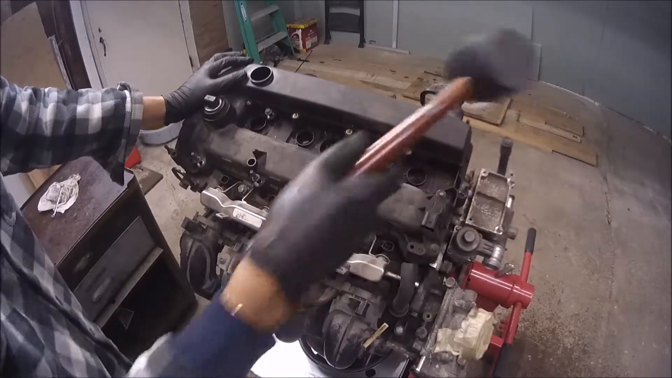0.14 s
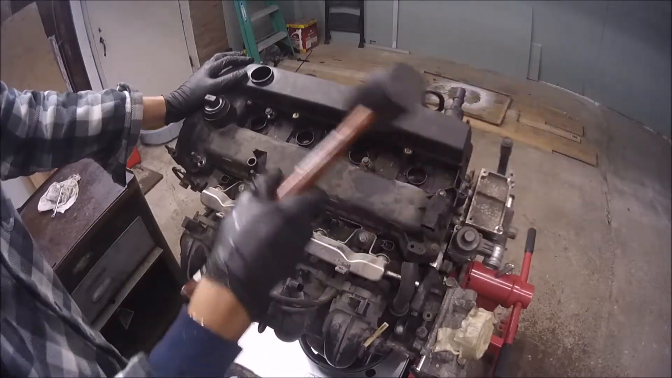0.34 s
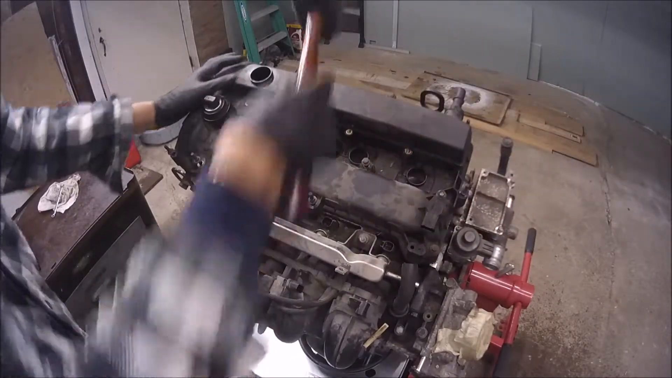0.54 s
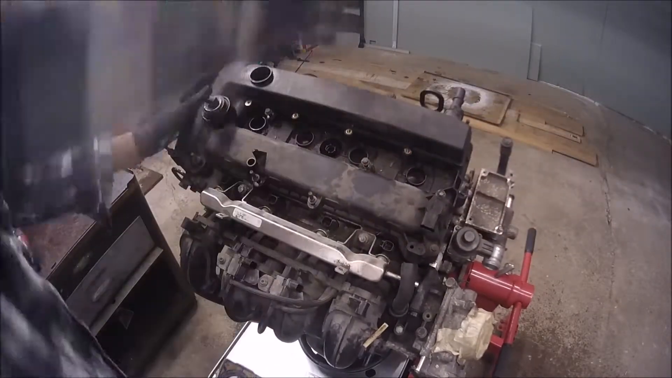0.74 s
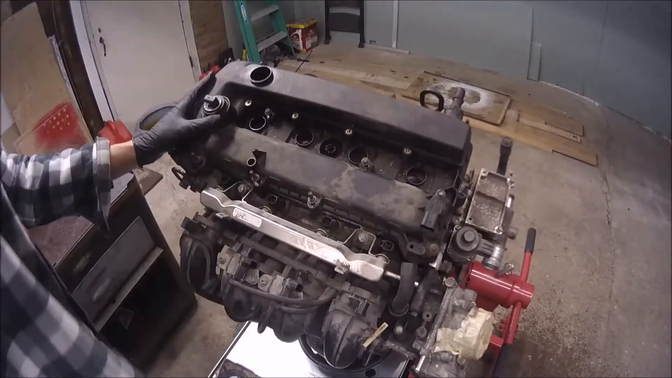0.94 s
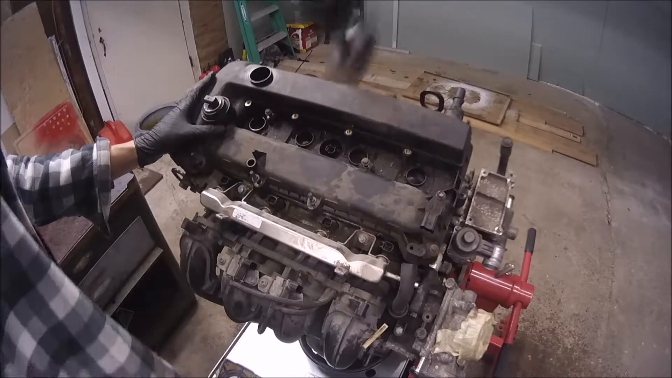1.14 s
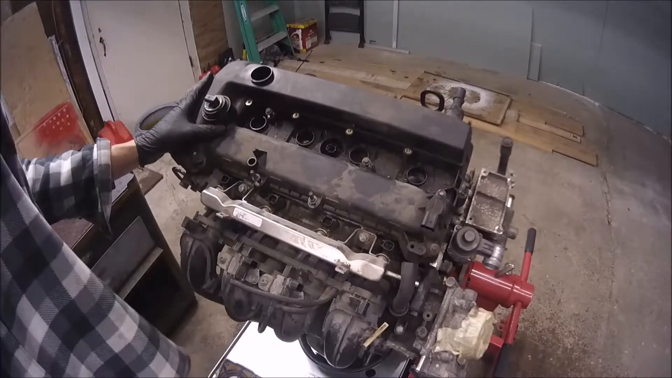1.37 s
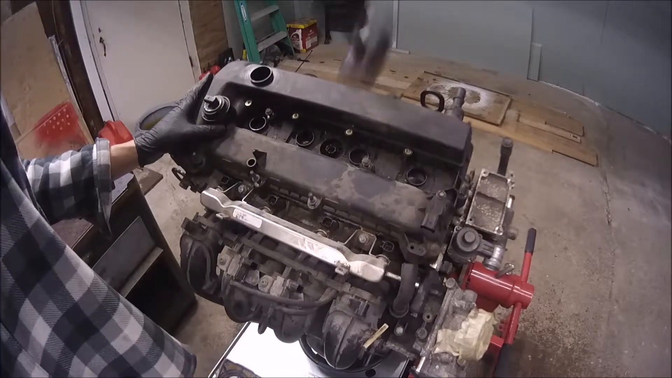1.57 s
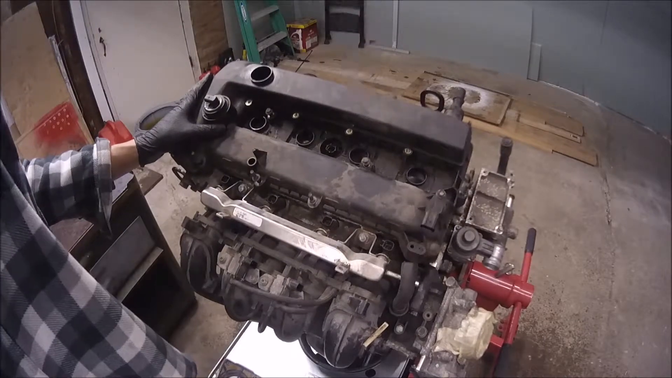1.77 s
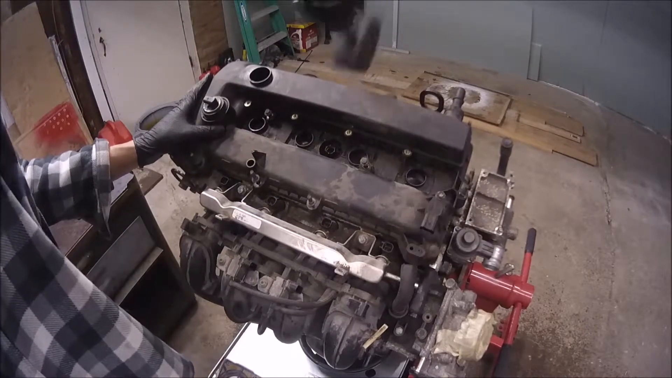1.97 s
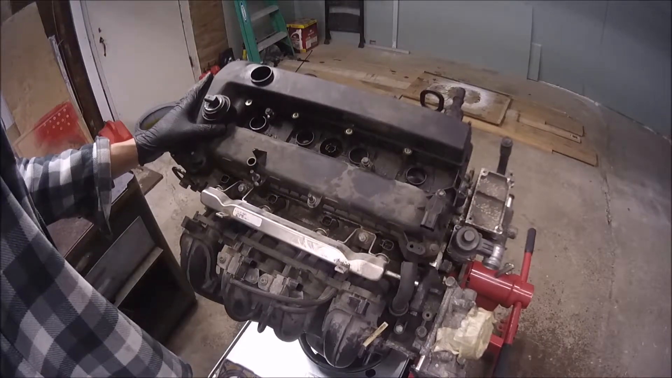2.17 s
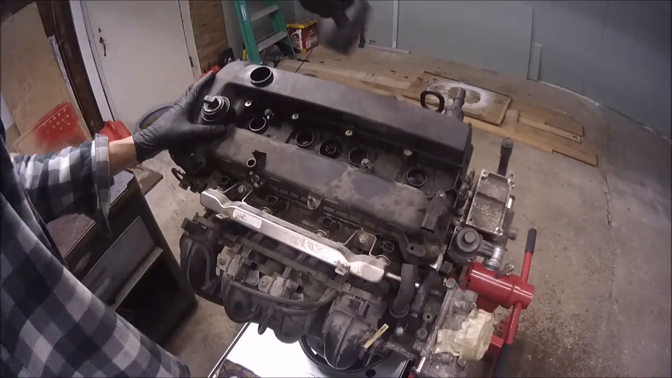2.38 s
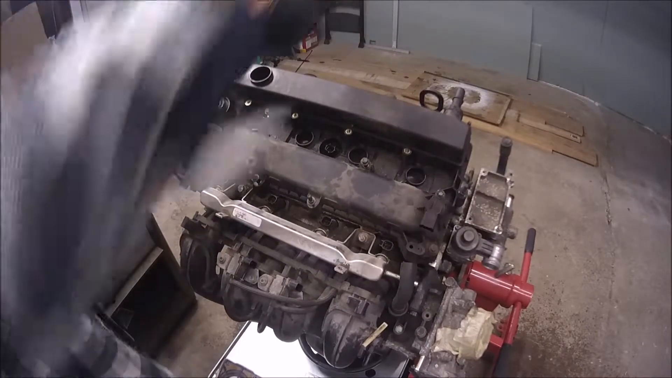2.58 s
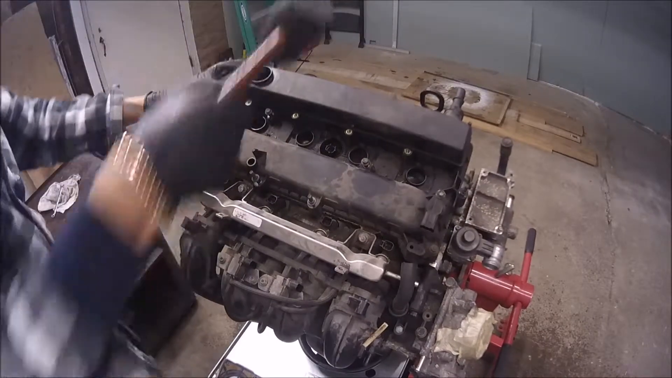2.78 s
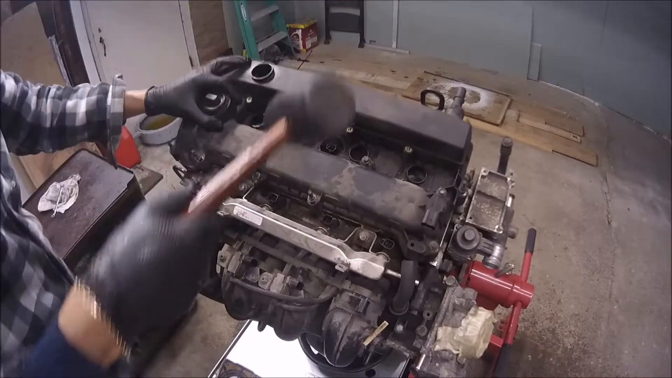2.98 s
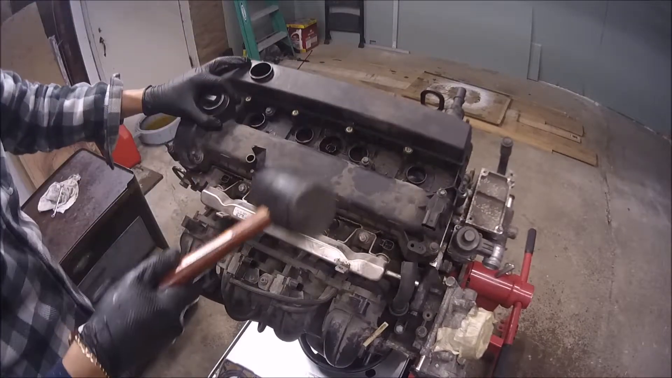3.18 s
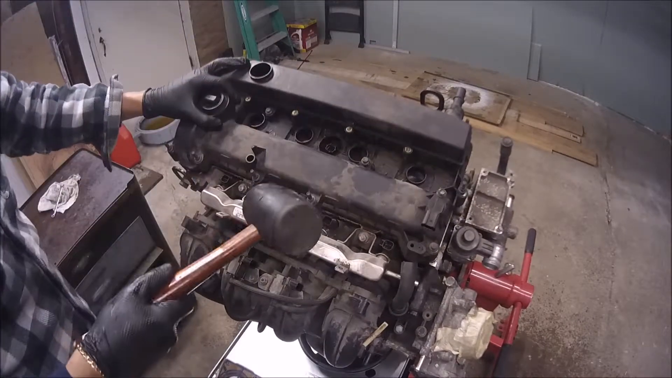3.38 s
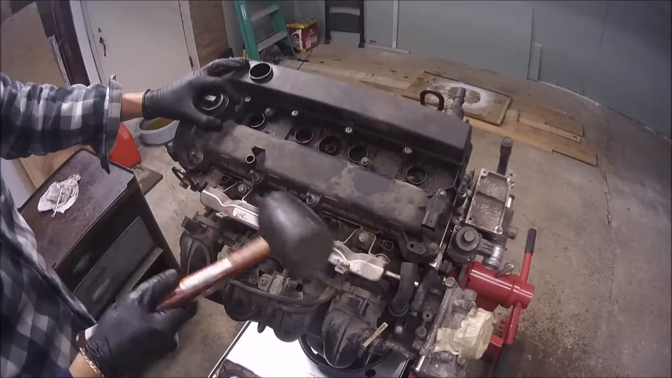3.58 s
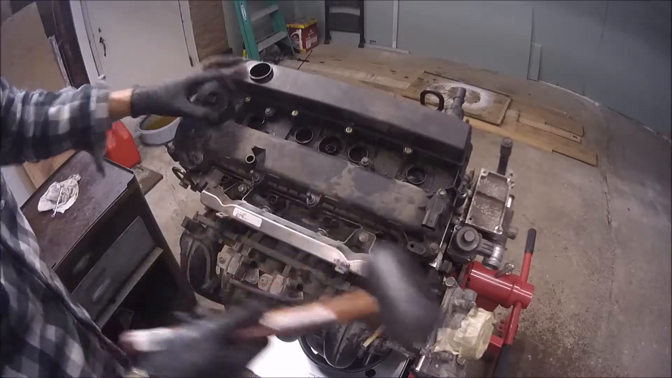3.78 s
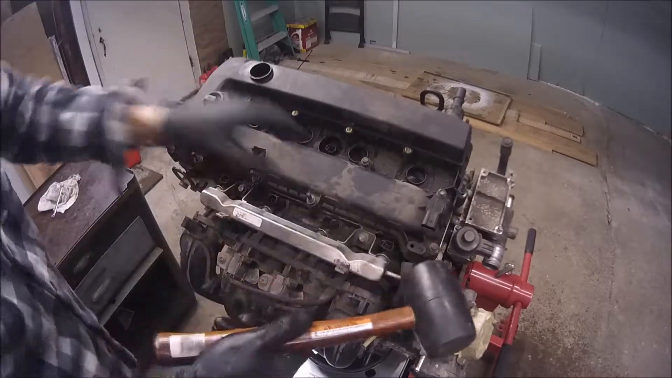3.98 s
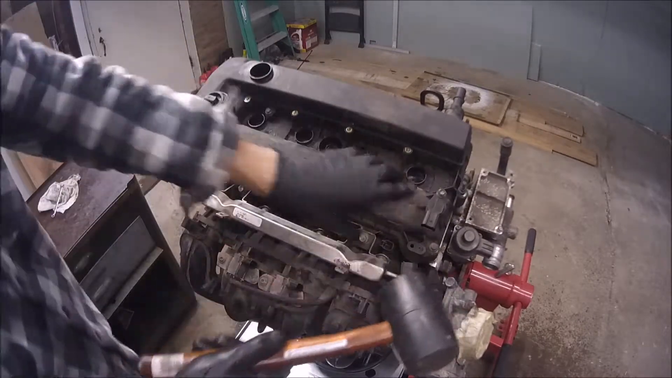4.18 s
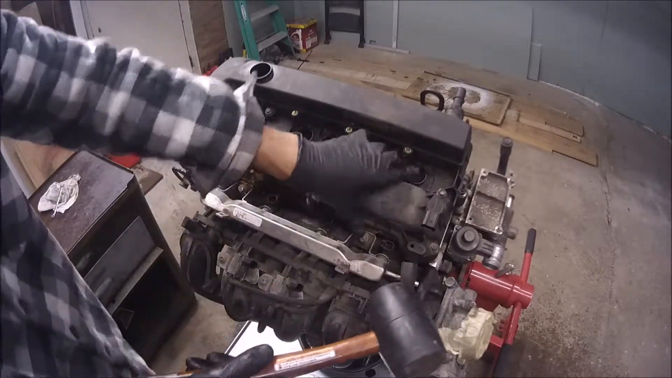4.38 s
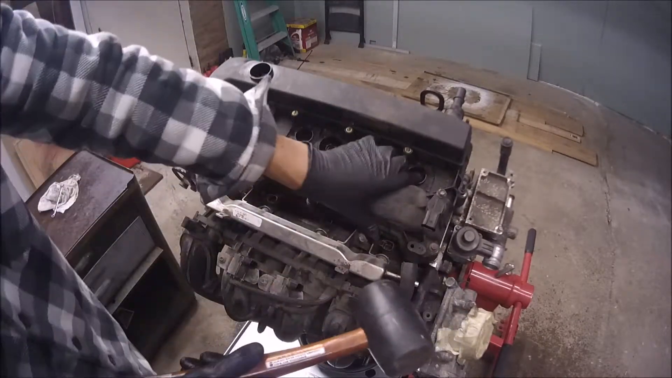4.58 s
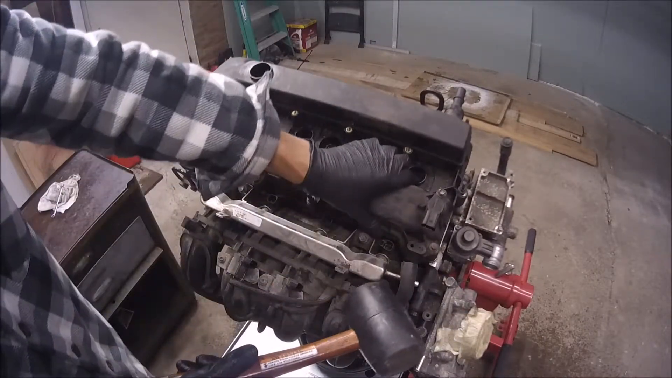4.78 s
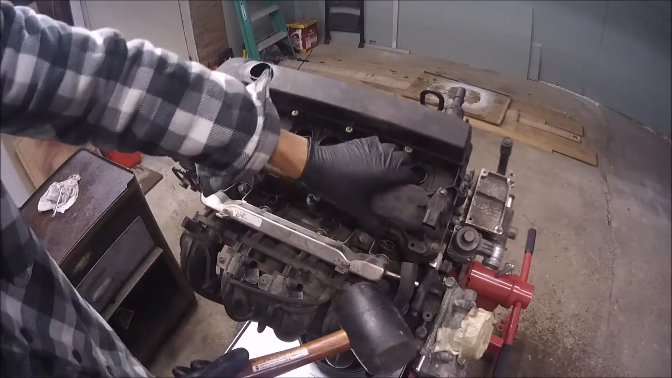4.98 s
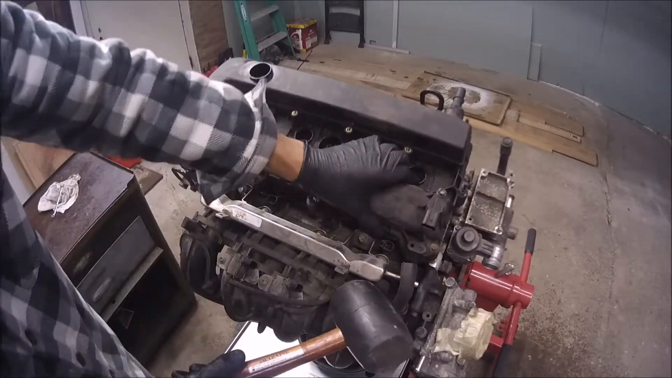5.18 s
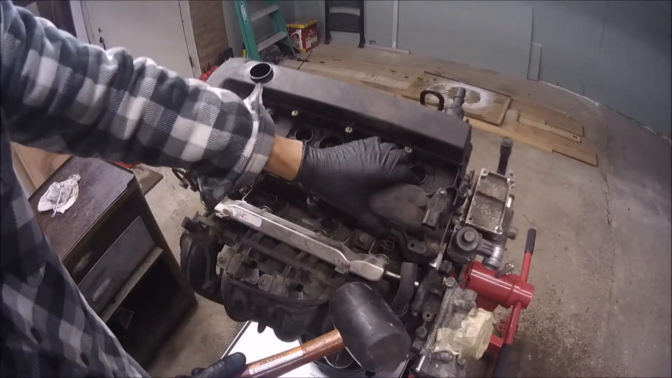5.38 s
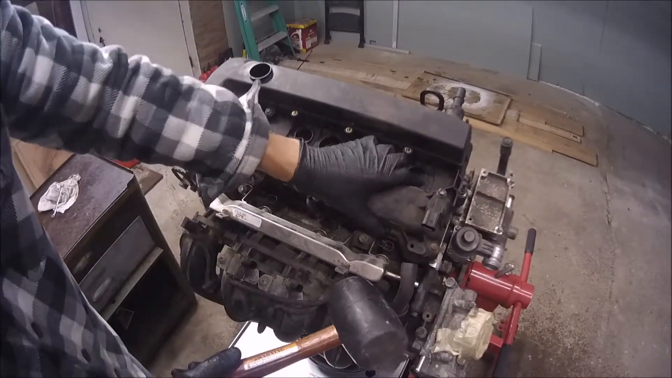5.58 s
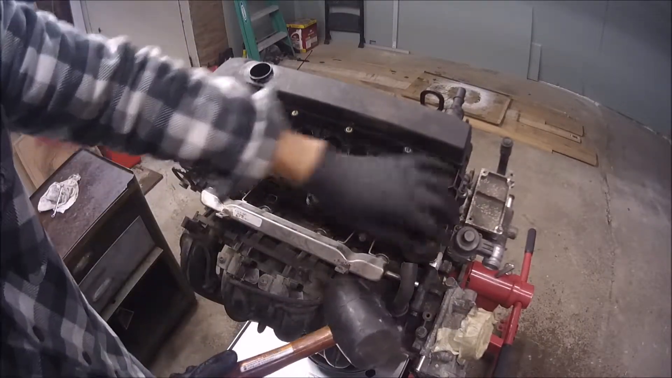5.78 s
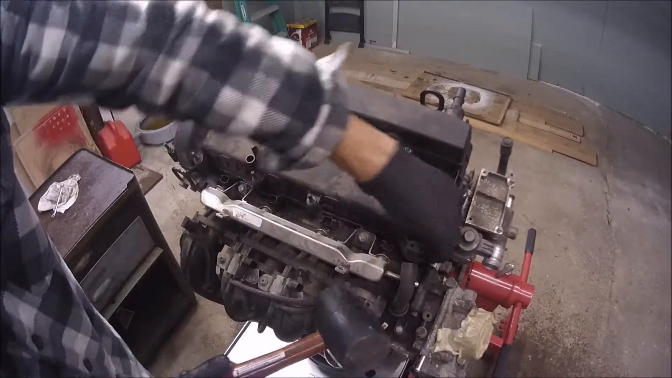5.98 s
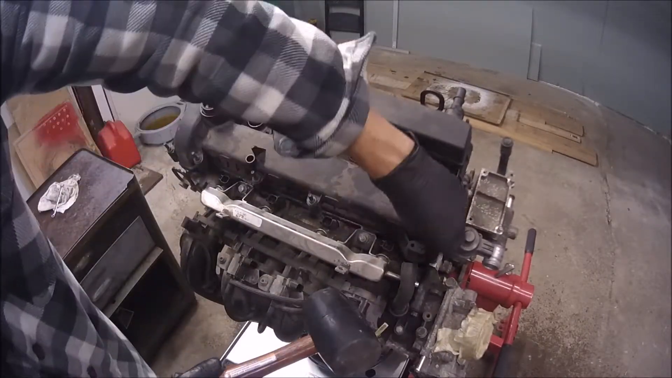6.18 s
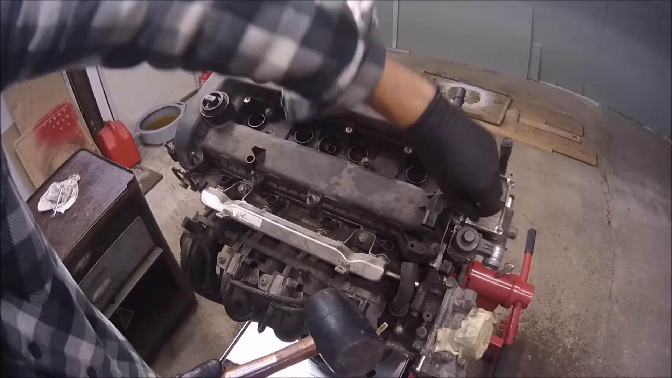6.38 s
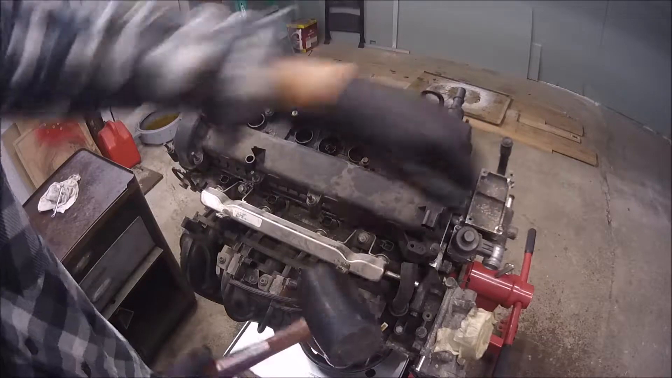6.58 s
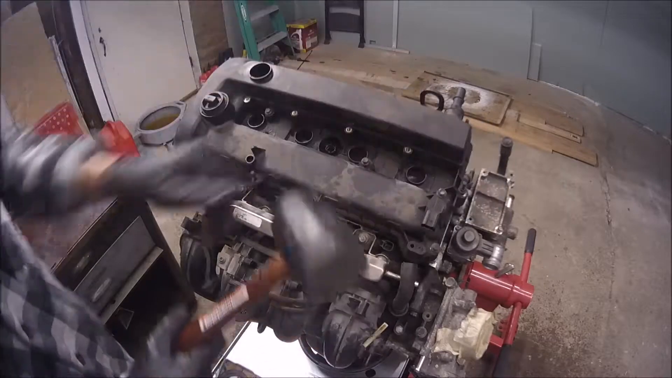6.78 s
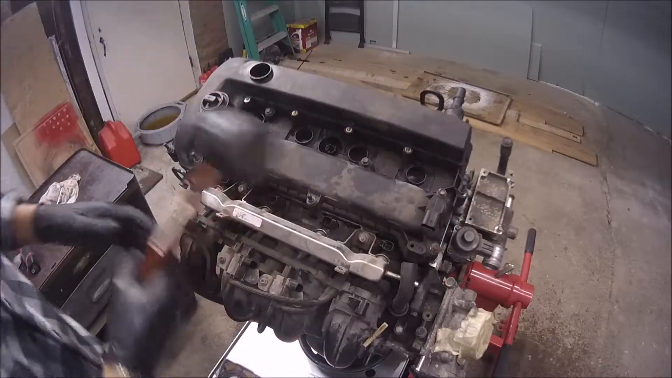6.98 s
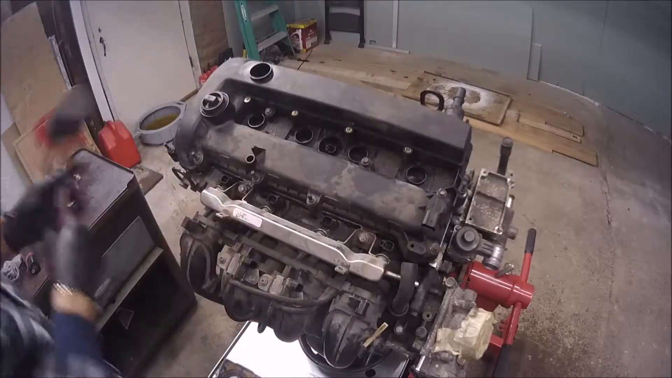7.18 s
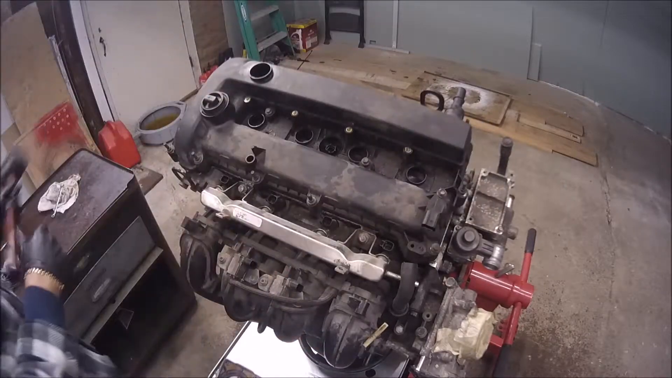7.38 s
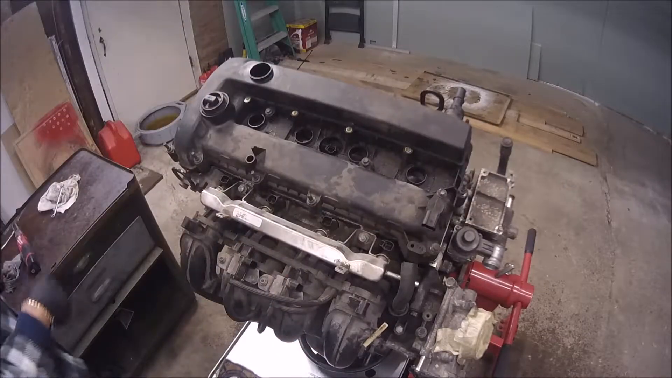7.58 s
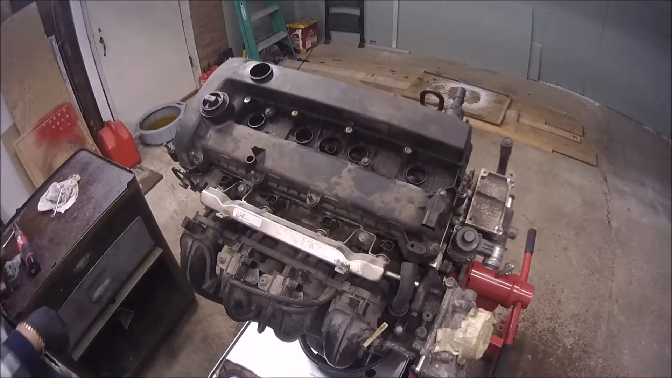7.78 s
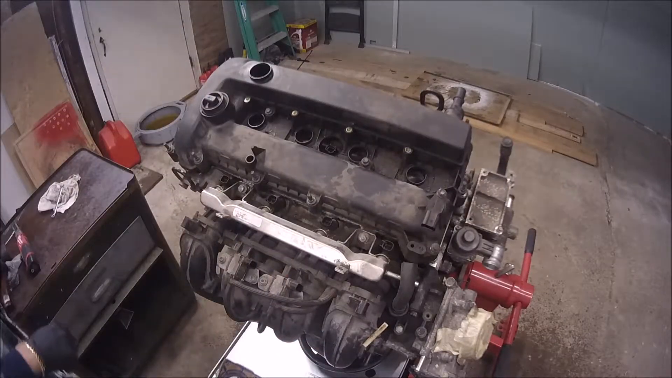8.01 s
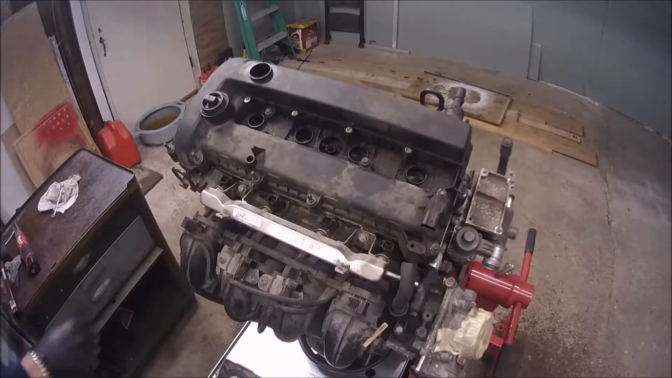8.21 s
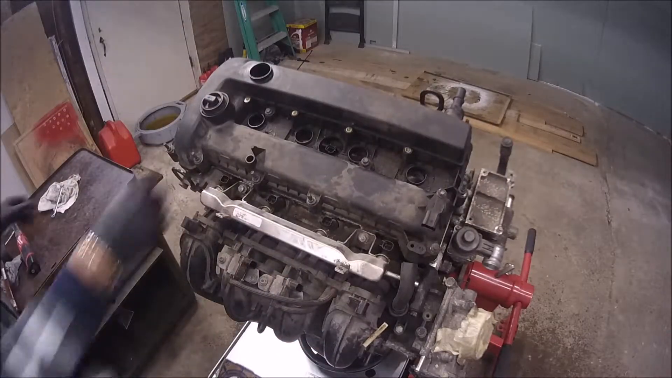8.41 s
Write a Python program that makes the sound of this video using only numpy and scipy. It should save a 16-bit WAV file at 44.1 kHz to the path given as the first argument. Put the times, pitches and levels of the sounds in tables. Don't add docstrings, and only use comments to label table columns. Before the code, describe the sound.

A rubber mallet slams a loose engine cover, overloading a small microphone; sleeves rustle and gloved fingertips tap and tug the parts afterward.

```python
import sys
import numpy as np
from scipy import signal
from scipy.fft import rfft, irfft
from scipy.io import wavfile
from scipy.ndimage import uniform_filter1d

SR = 44100
rng = np.random.default_rng(int(sys.argv[2]) if len(sys.argv) > 2 else 0)


def elevation(decibels):
    levels = np.asarray(decibels, float)
    return 10 ** (levels / 20)


def int16_out(signal):
    q = np.round(np.clip(np.atleast_2d(signal).T, -1, 1) * 32767)
    wavfile.write(sys.argv[1], SR, q.astype(np.int16))


N = 372644

# frequency in Hz, density in dB per Hz.
HISS_SPECTRUM = [(30, -24.5), (70, -20), (250, -7), (600, -2.5), (2000, -5.5), (7000, -13), (10000, -11),
                 (15400, -15.5)]
# time in seconds, gain in dB.
HISS_DUCKING = [(0, -1.5), (1.2, -2), (2.801, -4.5), (3.0, -9.5), (3.5, -10.5), (3.9, -3.5), (6.5, -3.5),
                (7.0, -4), (8.45, -3)]
# peak time in seconds, level in dB,
# brightness in dB per band, swell in seconds, fade in seconds (20 dB each).
RUSTLE_MOVES = [(0.558, -48.5, 5, .14, 0.088), (0.677, -40.5, -4.5, 0.036, 0.14),
                (0.8, -59.5, 1, 0.087, 0.15), (0.95, -58, 0.5, 0.2, 0.14), (1.05, -54.5, -6.5, .06, 0.23),
                (3.05, -55.5, -10, 0.074, 0.033), (3.828, -49, 3, .1, 0.026),
                (3.874, -63, -14.5, 0.026, 0.052), (4.25, -41, 2, 0.031, 0.11),
                (4.393, -44.5, -.4, 0.054, 0.044), (4.44, -57.5, -10, .025, 0.13),
                (4.5, -50, 2, 0.07, 0.31), (4.75, -56.5, -1.2, 0.38, .3), (4.95, -59, 5, 0.07, 0.14),
                (5.329, -55.5, -0.5, 0.055, 0.22), (5.678, -48.5, -4, .1, 0.099),
                (5.92, -50, 5, 0.036, 0.07), (6.0, -57, -1.5, 0.053, .3), (6.2, -59, -3.5, .1, .08),
                (7.175, -47.5, 5, 0.019, 0.29), (7.29, -55, -3, .08, 0.26), (7.8, -60, -6, .03, 0.16),
                (7.917, -49, -12, 0.12, 0.14), (8.17, -51, -2.8, 0.11, 0.083)]
CLOTH_BANDS_DB = [-5, 2.5, 1.1, -4]
# frequency in Hz, t60 in seconds.
GARAGE_DECAY = [(100, 0.95), (260, 0.65), (700, 0.68), (1840, 0.64), (4850, 0.68), (9000, 0.5),
                (13000, 0.15)]
# frequency in Hz, level in dB.
WALL_COLOUR = [(100, -32.5), (200, 2.5), (300, 0.5), (1000, 0), (3000, -0.5), (7000, -4), (12000, -1.5),
               (15400, -14.5)]
# start in seconds, peak in dB, frequency in Hz, t60 in seconds.
THUDS = [(0.006, -31.5, 122, 0.45), (0.008, -22.5, 205, 0.21), (0.008, -24.5, 255, 0.38),
         (0.008, -28.5, 511, 0.47), (0.658, -42, 320, 0.1), (0.665, -54, 195, 0.17),
         (1.22, -33, 156.3, 0.6), (1.657, -33, 156, 0.3), (2.022, -37, 152, 0.27), (2.331, -29, 158, 0.17),
         (3.061, -57.5, 129, 0.091), (3.195, -55, 320, 0.14), (3.805, -53, 320, .12), (3.874, -50, 302, .1),
         (4.099, -62.5, 150.3, 0.48), (4.48, -52, 330, 0.18), (4.739, -54, 332, .15),
         (7.89, -31.5, 111, 0.42), (7.894, -42, 82, 0.4), (7.937, -33.5, 138.5, 0.35),
         (7.99, -43, 103.4, 0.62), (8.059, -49.5, 251, 0.5), (8.191, -41, 123, 0.72), (8.25, -45, 96, 0.59)]
# start in seconds, peak in dB, frequency in Hz, t60 in seconds.
STEEL_PING = [
    (3.0605, -41, 13200, .18),
]
# start in seconds, then peak, body, bright and room levels in dB.
FAR_KNOCK = [
    (8.191, -5.5, -15, -18.5, 4.5),
]
# start in seconds, then peak, bright and room levels in dB.
TICKS = [(0.019, -8, 1, -11), (0.764, -44.5, 11.5, -2.5), (0.785, -43, 8, -12), (1.178, -49, 20, 0.5),
         (1.197, -48, 27, 6), (1.62, -41.5, 19, -1), (1.629, -33.5, 12.5, -4), (1.646, -37, 14, -4),
         (1.995, -42, 14.5, -12), (4.74, -52.5, 18, -9), (4.838, -39, 6, -3), (5.671, -41.5, 9.5, -13),
         (5.912, -46.5, 10, 4), (6.266, -24.5, -2, -16), (6.275, -22.5, 12, -6), (6.369, -19, 6.5, -8.5)]
# start in seconds, then peak, body, bright and room levels in dB.
TAPS = [(0.073, -16, -19, 3.5, -10.5), (0.636, -28.5, -29.5, -2, -4), (3.001, -42, -1, -5, -8),
        (3.78, -41, -1, -9, -4), (2.783, -27, -27, 3, -12), (3.87, -26, -14, -3.5, -3),
        (4.868, -28.5, -4, -13, 5), (4.883, -9.5, -21, -8, -12), (4.901, -27.5, -6, -17, -21.5),
        (4.923, -12, -17.5, -17, -18), (4.93, -18, -20, -12, -18.5), (5.081, -27.5, -7.5, -38, -8),
        (5.159, -21.5, -20.5, -15, -6.5), (5.241, -26, -2, -10, -11), (5.297, -22, -11.5, -13, -8.5),
        (5.551, -39, 14.5, -7, -8.5), (5.564, -9.5, -24.5, -10.5, -12), (5.933, -10.5, -25.5, -5.5, -12),
        (6.173, -34.5, -15.5, -17, -4), (6.236, -19.5, -22, -11.5, -5), (7.23, -42, -28, 9, 0.5),
        (7.794, -51, -23, -5.5, 4), (7.911, -41, 10.5, 4.5, -4), (7.991, -43, 11, -6, -6)]
# start in seconds, then peak, body, bright and room levels in dB.
DRUMMING = [
    (4.257, -14, -18.5, -13, -8),
    (4.266, -20.5, -27, -5, -6),
    (4.347, -16, -28, -8.5, -6),
    (4.433, -14, -32, -6.5, -11),
]
# start in seconds, then peak, body, bright and room levels in dB.
KNOCKS = [
    (0.005, -9, -3.5, -6.5, -12.5),
    (3.058, -8, -19.5, -10, -8),
    (6.259, -11.5, -19, -7, -1),
    (6.283, -3.5, -17, -14.5, -9.5),
    (6.322, -11, -10, 3, -11.5),
]
# start in seconds, then peak and room levels in dB.
BLOWS = [
    (1.217, 2.5, -7.5),
    (1.654, 5, -10.5),
    (2.022, 0, -7),
    (2.331, -1.5, -9.5),
]

# frequency in Hz, level in dB, t60 in seconds.
CAP_MODES = [(776, -1, 0.13), (1040, -13, 0.024), (2000, 14.5, 0.011), (2300, -20, .04), (2580, 5, 0.028),
             (3070, -18, .03)]
# frequency in Hz, level in dB, t60 in seconds.
PARTS_MODES = [(324, -4.5, 0.0093), (707, -5, 0.03), (913, -3.5, 0.033), (1075, -3.5, 0.057),
               (1210, -12.5, 0.023), (1880, -9.5, 0.012), (2010, -16, 0.021), (2223, -6.5, 0.06),
               (2600, -7, .02), (2860, 1, .015)]
# frequency in Hz, level in dB, t60 in seconds.
COVER_MODES = [(288, -3.5, 0.36), (414, -9, 0.12), (579, 2, 0.06), (857.6, 2, 0.21), (1039.3, -0.5, 0.092),
               (1081, 0.5, 0.13), (1279, -8.5, .06), (1500, -13.5, 0.09), (1735, -14.5, 0.13),
               (2570, -18.5, 0.044), (472, -11, 0.18), (260, -11.5, .12), (4030, -10, .04), (5230, -9, .04)]
# frequency in Hz, width in Hz, boost in dB.
FAR_HUMPS = [(710, 210, 3.5), (1530, 790, 1), (2170, 510, 2.5), (2770, 320, -4.5)]
# frequency in Hz, width in Hz, boost in dB.
CAP_HUMPS = [(830, 96, 8), (1430, 320, -3.5), (2130, 380, 1.5)]
# frequency in Hz, width in Hz, boost in dB.
PARTS_HUMPS = [(345, 27, 11), (900, 600, 2.9), (2480, 500, 3.3), (2840, 1100, 2), (5100, 320, 6.2)]
# frequency in Hz, width in Hz, boost in dB.
COVER_HUMPS = [(278, 29, 6.5), (594, 92, 6), (932, 63, 7.5), (1113, 71, 7), (1980, 160, 7),
               (2690, 250, 2.5), (3940, 550, 4.5), (5280, 450, 5.5)]
TILT_HZ = [100, 400, 1400, 4500, 10000, 15500]


def band(x, low_hz, high_hz):
    return signal.sosfilt(signal.butter(2, [low_hz, high_hz], "band", fs=SR, output="sos"), x)


def high_pass(x, hz):
    return signal.sosfilt(signal.butter(4, hz, "high", fs=SR, output="sos"), x)


def rms_one(x):
    return x / np.sqrt(np.mean(x ** 2) + 1e-20)


def at_hz(points, hz):
    table = np.array(points)
    return np.interp(np.log(hz), np.log(table[:, 0]), table[:, 1])


def fade(t, t60):
    return np.exp(-np.log(1000) * t / max(t60, .003))


def add(out, s, sound):
    start = round(s * SR)
    out[start:start + len(sound)] += sound[:N - start]


def third_octaves(size):
    white = rng.standard_normal((2, size))
    edges = 30 * 2 ** (np.arange(29) / 3)
    for k, (low, high) in enumerate(zip(edges, edges[1:])):
        yield np.sqrt(low * high), band(white[k % 2], low, high)


def tones(rows, rise_s):
    out, t = np.zeros(N), np.arange(SR // 2) / SR
    for s, db, hz, t60 in rows:
        sine = np.sin(2 * np.pi * hz * t)
        add(out, s, elevation(db) * sine * fade(t, t60) * (1 - np.exp(-t / rise_s)))
    return out


def hiss():
    level_db, top_duck, blow_duck_db, blow_duck_s = -50.5, 1.25, -12.5, 1
    t = np.arange(N) / SR
    bands = [(hz, elevation(at_hz(HISS_SPECTRUM, hz)) * x) for hz, x in third_octaves(N)]
    low = sum(x for hz, x in bands if hz < 9000)
    top = sum(x for hz, x in bands if hz >= 9000)
    duck_db = np.interp(t, *np.transpose(HISS_DUCKING))
    shut = [(t > s) * np.clip(1 - ((t - s) / blow_duck_s) ** 2, 0, 1) for s, _, _ in BLOWS]
    top_db = top_duck * duck_db + blow_duck_db * np.max(shut, axis=0)
    return elevation(level_db) * (elevation(duck_db) * low + elevation(top_db) * top) / np.std(low + top)


def rustle():
    grains_per_s, grain_share, flutter_db = 5000, .6, 1.6
    grain_sizes = elevation(2.5 * np.minimum(rng.exponential(1, N), 4)) * rng.choice([-1, 1], N)
    grains = (rng.random(N) < grains_per_s / SR) * grain_sizes
    cloth = grain_share * rms_one(grains) + rng.standard_normal(N)
    t = np.arange(0, N, 32) / SR
    s, db, bright_db, swell_s, fade_s = np.transpose(RUSTLE_MOVES)[:, :, None]
    movements_db = db - 20 * np.maximum((s - t) / swell_s, (t - s) / fade_s)
    bands_hz = [(900, 2700), (2000, 5600), (4500, 11000), (8000, 22000)]
    out = np.zeros(N)
    for k, (low, high) in enumerate(bands_hz):
        flutter = elevation(flutter_db * rms_one(band(rng.standard_normal(N), 8, 40)))
        level = elevation(movements_db + (k - 1.5) * bright_db + CLOTH_BANDS_DB[k]).sum(axis=0)
        out += np.interp(np.arange(N) / SR, t, level) * rms_one(flutter * band(cloth, low, high))
    return out


def garage(x, stretch):
    build_s = 0.0013
    t = np.arange(SR) / SR
    tail = np.zeros(SR)
    for hz, noise in third_octaves(len(t)):
        tail += elevation(at_hz(WALL_COLOUR, hz)) * noise * fade(t, stretch * at_hz(GARAGE_DECAY, hz))
    tail = tail * (1 - np.exp(-(t / build_s) ** 2))
    return signal.fftconvolve(x, tail / np.sqrt(np.sum(tail ** 2)))[:N]


def thuds():
    partners = [(s, db - 8, hz * rng.uniform(1.07, 1.15), 1.1 * t60) for s, db, hz, t60 in THUDS]
    return high_pass(tones(THUDS + partners, rise_s=0.0017), 55)


def steel_ping():
    return tones(STEEL_PING, rise_s=0.0011)


def strike_colour(tilt, humps, bins_hz):
    ripple_db, ripple_bins = 1.6, 24
    hump_db = sum(db / (1 + (2 * (bins_hz - hz) / width) ** 2) for hz, width, db in humps)
    spot = rng.standard_normal(len(bins_hz))
    for _ in range(2):
        spot = uniform_filter1d(spot, size=ripple_bins)
    return elevation(at_hz(tilt, bins_hz) + hump_db + ripple_db * rms_one(spot))


def ringing(t, modes, tilt, ring_db, scatter_db):
    longest_ring_s, most_scatter_db = .13, 3.5
    chance = np.clip(rng.standard_normal((2, len(modes))), -1.5, 1.5)
    rings = np.zeros(len(t))
    for (hz, db, t60), strength, detune in zip(modes, *chance):
        level_db = db + ring_db + min(scatter_db, most_scatter_db) * strength + at_hz(tilt, hz)
        sine = np.sin(2 * np.pi * hz * (1 + 0.0073 * detune) * t)
        rings += elevation(level_db) * sine * fade(t, min(t60, longest_ring_s))
    return rings


def contacts(rows, modes, humps, clatter_t60, hold_s, ring_db, scatter_db, rise_s, boost_db, dulling_db):
    ring_to_room = .4
    out, t = np.zeros((2, N)), np.arange(SR // 4) / SR
    bins_hz = np.fft.rfftfreq(len(t), 1 / SR) + 1
    settles = 0.4 + 0.71 / (1 + np.exp(np.minimum((t - hold_s) / 0.0053, 50)))
    for s, peak_db, body_db, bright_db, room_db in rows:
        top_db = bright_db + dulling_db
        tilt_db = [body_db - 6.5, body_db + 9.5, 0, bright_db - 0.5, top_db + 2.5, top_db - 16]
        tilt = np.transpose([TILT_HZ, tilt_db])
        colour = strike_colour(tilt, humps, bins_hz)
        white = rng.standard_normal(len(t))
        clatter = 1.66 * irfft(rfft(white) * colour, len(t)) * fade(t, clatter_t60)
        clatter *= 1 - np.exp(-(t / (2.6 * rise_s)) ** 2)
        rings = ringing(t, modes, tilt, ring_db, scatter_db)
        peak = elevation(peak_db + boost_db)
        onset = peak * (1 - np.exp(-t / rise_s))
        add(out[0], s - rise_s, onset * settles * (rings + clatter))
        pulse = np.roll(irfft(colour, len(t)), SR // 300) * np.sqrt(SR * clatter_t60 / 8)
        feed = peak * pulse * (t < .02) + ring_to_room * onset * rings
        add(out[1], s - rise_s, elevation(room_db) * feed)
    return out


def far_knock():
    return contacts(FAR_KNOCK, PARTS_MODES, FAR_HUMPS, clatter_t60=0.044, hold_s=0.019, ring_db=-27,
                    scatter_db=0.0, rise_s=0.00062, boost_db=-1.4, dulling_db=-11.0)


def ticks():
    rows = [(s, db, -20.5, bright_db, room_db) for s, db, bright_db, room_db in TICKS]
    return contacts(rows, PARTS_MODES, PARTS_HUMPS, clatter_t60=0.024, hold_s=0.0023, ring_db=-10.5,
                    scatter_db=3.0, rise_s=0.0002, boost_db=-0.66, dulling_db=-2)


def taps():
    return contacts(TAPS, PARTS_MODES, PARTS_HUMPS, clatter_t60=0.032, hold_s=0.004, ring_db=-8.0,
                    scatter_db=6.0, rise_s=0.00041, boost_db=-0.27, dulling_db=-17.5)


def drumming():
    return contacts(DRUMMING, CAP_MODES, CAP_HUMPS, clatter_t60=0.02, hold_s=0.0057, ring_db=-11.5,
                    scatter_db=-3.5, rise_s=0.00027, boost_db=0.9, dulling_db=-37)


def knocks():
    return contacts(KNOCKS, PARTS_MODES, PARTS_HUMPS, clatter_t60=0.043, hold_s=0.0043, ring_db=-8.5,
                    scatter_db=1.5, rise_s=.0005, boost_db=4.0, dulling_db=-7)


def blows():
    body_db, bright_db = -11.5, -6
    rows = [(s, db, body_db, bright_db, room_db) for s, db, room_db in BLOWS]
    return contacts(rows, COVER_MODES, COVER_HUMPS, clatter_t60=0.093, hold_s=0.015, ring_db=-12.5,
                    scatter_db=3.0, rise_s=0.00082, boost_db=6.5, dulling_db=-2.0)


def scene():
    low_cut_hz, small_low_cut_hz = 63, 260
    jolt_db = -25.5
    firm = knocks()
    small = high_pass(firm + taps() + ticks() + drumming(), small_low_cut_hz)
    near = high_pass(-blows(), low_cut_hz) + small
    far = high_pass(far_knock(), small_low_cut_hz)
    direct = near[0] + far[0] + elevation(jolt_db) * firm[0]
    left = np.searchsorted([s - .005 for s, _, _ in BLOWS], np.arange(N) / SR) % 2 == 0
    echoes = garage(near[1] * left, stretch=0.85) + garage(near[1] * ~left, stretch=0.88)
    echoes += garage(far[1], stretch=0.97)
    return (hiss() + rustle() + thuds() + steel_ping() + echoes + direct)[None]


def low_pass(x):
    return signal.sosfilt(signal.butter(12, 15600, fs=SR, output="sos"), x)


def record(dry):
    gap_hz, gap_width_hz, cutoff_hz, overload = 7890, 730, 15450, .96
    gap_edges_hz = [gap_hz - gap_width_hz / 2, gap_hz + gap_width_hz / 2]
    gap = signal.butter(2, gap_edges_hz, "bandstop", fs=SR, output="sos")
    top_cut = signal.ellip(8, .5, 50, cutoff_hz, fs=SR, output="sos")
    clipped = np.clip(signal.sosfilt(np.vstack([gap, top_cut]), dry), -overload, overload)
    smoothed = signal.sosfilt(signal.ellip(4, .5, 14, cutoff_hz, fs=SR, output="sos"), clipped)
    return low_pass(np.clip(smoothed, -1, 1))


dry = scene()
out = record(dry)
int16_out(out)
```